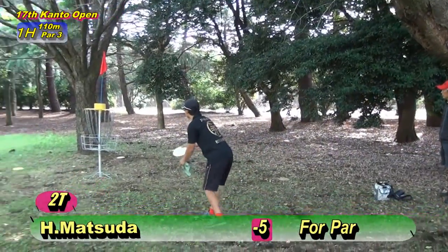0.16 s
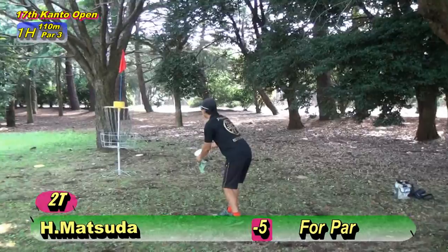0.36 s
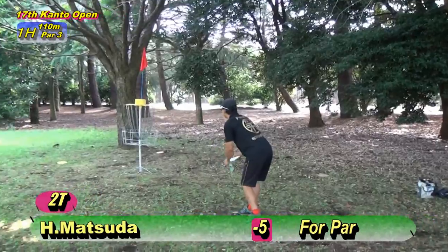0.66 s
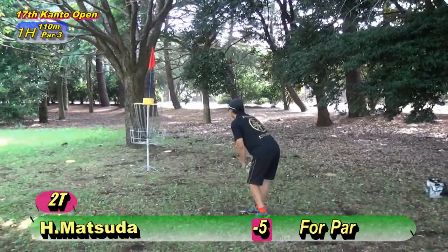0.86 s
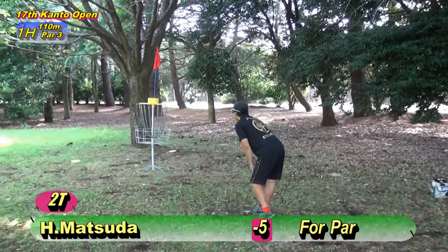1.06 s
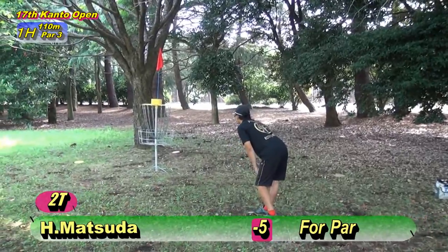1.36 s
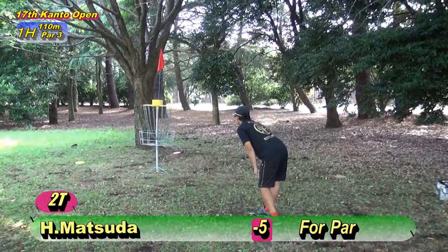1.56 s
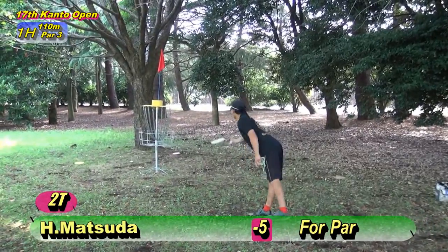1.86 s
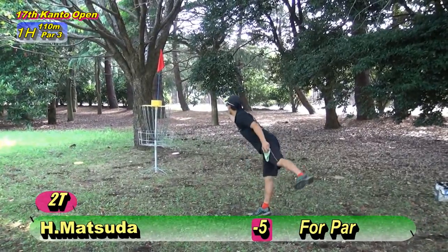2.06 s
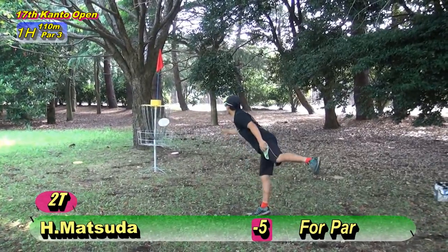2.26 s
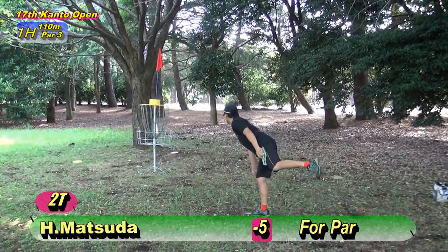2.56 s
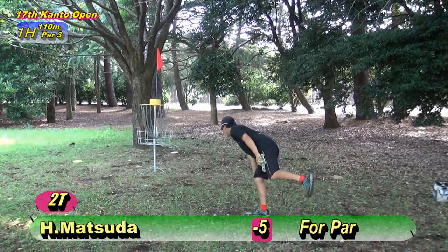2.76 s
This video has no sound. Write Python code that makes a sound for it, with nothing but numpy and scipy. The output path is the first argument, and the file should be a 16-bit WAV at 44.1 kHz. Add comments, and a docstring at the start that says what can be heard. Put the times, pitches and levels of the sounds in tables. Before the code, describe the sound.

A thrown plastic disc hits the steel chains of a target basket with a knock and bright jangling rattle, then drops into the tray; before it, only cicadas and a faint shoe scuff in an open wooded park.

```python
"""Disc putt in a wooded park

A shoe scuffs litter (noise bursts); a plastic disc knocks on a steel basket (noise, cage modes) and drops in.
Chain links rattle in surges of random ticks through link modes; clinks, clashes and ring chimes stand out.
Cicadas, a pulsed noise band and fuzzy overtones, sink in pitch over low rumble and a faint hiss of leaves."""
import sys
import numpy as np
from scipy import signal
from scipy.fft import rfft, irfft, next_fast_len
from scipy.io import wavfile
from scipy.ndimage import uniform_filter1d, map_coordinates

SR = 44100
rng = np.random.default_rng(int(sys.argv[2]) if len(sys.argv) > 2 else 0)


def transcribe(u):
    """Save the signal u as a 16-bit wav file named by the first command-line argument.

    u: samples, shape (n,) or (channels, n), limited to [-1, 1]; the rate is SR.
    q: integer samples, one column per channel.
    """
    v = np.clip(np.atleast_2d(u).T, -1, 1)
    q = np.round(v * 32767).astype(np.int16)
    wavfile.write(sys.argv[1], SR, q)


N = 127890
TOP_HZ = 15300  # upper band limit
CONTACT_RISE_S = 0.0015  # onset of a steel ringing

# modes of one chain link: mode_hz, level_db, t60_s
LINK_MODES = [(11530, -1.5, 0.13), (11440, -10.5, 0.051), (12540, -10.5, 0.11), (13760, -13.5, 0.07)]


def amp(db):
    """Decibels to gain."""
    return 10 ** (np.asarray(db) / 20)


def unit(x):
    """Scale to rms 1."""
    return x / np.sqrt(np.mean(x ** 2) + 1e-20)


def along(points, hz):
    """Interpolate (Hz, value) points on a log frequency axis."""
    point_hz, value = np.transpose(points)
    return np.interp(np.log(hz + 1), np.log(point_hz + 1), value)


def filtered(x, response):
    """Multiply the spectrum of x by a response of frequency."""
    size = next_fast_len(N + 8192)
    return irfft(rfft(x, size) * response(np.fft.rfftfreq(size, 1 / SR)), size)[..., :N]


def noise(spectrum, tilt_db_per_octave=0):
    """Coloured noise of rms 1, tilted about 1 kHz (tilt constant below 400 Hz)."""
    def response(hz):
        tilt_db = tilt_db_per_octave * np.log2(np.maximum(hz, 400) / 1000)
        return amp(along(spectrum, hz) + tilt_db) * hz / (hz + 60)
    return unit(filtered(rng.standard_normal(N), response))


def swell(start_s, level_db, rise_s, t60_s):
    """An envelope that rises straight and dies exponentially."""
    t = np.arange(N) / SR - start_s
    return np.clip(t / rise_s, 0, 1) * amp(level_db - 60 * np.maximum(t - rise_s, 0) / t60_s)


def ringing(modes, detune, scatter_db=2):
    """Half a second of decaying sine modes, with random detuning, level and phase."""
    t = np.arange(SR // 2) / SR
    total = 0
    for hz, level_db, t60_s in modes:
        decay = amp(level_db + scatter_db * rng.normal() - 60 * t / t60_s)
        total = total + decay * np.sin(2 * np.pi * (hz * (1 + detune * rng.normal()) * t + rng.random()))
    return total


def strike(start_s, modes):
    """One ringing of a steel part, with a short straight onset."""
    rise = np.minimum(np.arange(SR // 2) / SR / CONTACT_RISE_S, 1)
    ring = ringing(modes, 0, scatter_db=0.5) * rise
    return np.pad(ring, (round(start_s * SR), N))[:N]


def placed(x, left_db):
    """Set a mono source between the ears; left_db is left minus right."""
    return x * amp(np.array([[left_db], [-left_db]]) / 2)


def air():
    """Distant rumble and faint leaf hiss: coloured noise, the rumble decorrelated between ears."""
    # rumble colour: hz, level_db
    rumble_colour = [(15, -50), (28, -15.5), (56, -9.5), (72, -0.5), (142, -3), (225, -5), (350, -17.5),
                     (520, -16), (880, -21), (5500, -47), (9000, -90)]
    # likeness of the two ears: hz, correlation
    ear_likeness = [(30, 0.67), (100, 0.96), (1000, 0.94), (4000, 1)]
    # balance: hz, left_minus_right_db
    balance = [(80, -1), (160, 7.5), (1000, 5), (4000, -2)]
    # leaf hiss colour: hz, level_db
    hiss_colour = [(3000, -7), (12900, -5.5), (13800, -55)]
    rumble_db, hiss_db = -45.5, -62.5

    def mid_side(hz):
        angle = np.arccos(np.clip(along(ear_likeness, hz), -1, 1)) / 2
        return amp(along(rumble_colour, hz)) * [np.cos(angle), np.sin(angle)]

    mid, side = filtered(rng.standard_normal((2, N)), mid_side)
    ears = np.array([mid + side, mid - side])
    rumble = filtered(ears, lambda hz: amp(np.outer([1, -1], along(balance, hz)) / 2))
    return amp(rumble_db) * unit(rumble) + amp(hiss_db) * noise(hiss_colour)


def cicadas():
    """A noise band pulsed by the tymbals slides in pitch through a fixed random spectral ripple."""
    # song: start_s, centre_hz, level_db
    song_path = [(0, 8560, -45.5), (.45, 8510, -46.5), (1, 8014, -46), (1.5, 7780, -47), (2, 7360, -46.5),
                 (2.9, 7040, -47)]
    # band colour before the slide: hz, level_db
    band = [(5000, -63), (6400, -24.5), (7100, -13), (7700, -4.5), (8150, -2), (8800, -6.5), (9700, -17),
            (11000, -29), (12500, -39)]
    band_centre_hz, ear_correlation = 8000, 0.42
    tymbal_hz, rate_jitter, pulse_depth = 495, 0.092, 0.22
    ripple_db, ripple_step_hz = 2, 44.9
    t = np.arange(N) / SR
    s, centre_hz, level_db = np.transpose(song_path)

    mid, side = filtered(rng.standard_normal((2, N)), lambda hz: amp(along(band, hz)))
    side = side * np.sqrt((1 - ear_correlation) / (1 + ear_correlation))
    shift_hz = np.interp(t, s, centre_hz) - band_centre_hz
    slide = np.exp(2j * np.pi * np.cumsum(shift_hz) / SR)
    rate_hz = tymbal_hz * (1 + rate_jitter * unit(uniform_filter1d(rng.standard_normal(N), size=400)))
    pulsing = 1 + pulse_depth * np.sin(2 * np.pi * np.cumsum(rate_hz) / SR)
    song = (signal.hilbert(np.array([mid + side, mid - side])) * slide).real * pulsing

    ripple = rng.uniform(-0.73, 1, size=1200)
    steps = np.arange(len(ripple))
    song = filtered(song, lambda hz: amp(ripple_db * np.interp(hz / ripple_step_hz, steps, ripple)))
    return unit(song) * amp(np.interp(t, s, level_db))


def cicada_lines():
    """As the song winds down, regular tymbal pulsing gives fuzzy lines at multiples of its rate."""
    # regular pulsing: start_s, rate_hz, level_db
    pulse_path = [(1.4, 613, -52), (2, 593.2, -50), (2.9, 573.6, -47)]
    # lines: multiple_of_rate, level_db
    overtones = [(10, -19), (11, -7), (12, 3.5), (13, 1)]
    rate_jitter = 0.00739
    s, path_hz, level_db = np.transpose(pulse_path)
    t = np.arange(N) / SR
    jitter = rate_jitter * unit(uniform_filter1d(rng.standard_normal(N), size=120))
    phase = 2 * np.pi * np.cumsum(np.interp(t, s, path_hz) * (1 + jitter)) / SR
    # each ear gets its own phase offsets
    tone = sum(amp(db) * np.sin(round(k) * phase + rng.normal(0, 0.99, (2, 1))) for k, db in overtones)
    return unit(tone) * amp(np.interp(t, s, level_db))


def shoe():
    """The thrower shifts weight on dry leaves: swells of litter-coloured noise."""
    # scuffs: start_s, level_db, rise_s, t60_s
    scuffs = [(1.71, -51, 0.016, 0.13), (1.868, -44, 0.0033, 0.15), (1.977, -51, 0.0022, 0.03)]
    # leaf litter colour: hz, level_db
    litter = [(250, -4), (750, 7.5), (2100, -6.5), (4000, -11.5), (9000, -38)]
    return noise(litter) * sum(swell(*row) for row in scuffs)


def disc():
    """Dead plastic knocks on chains, pole and tray: noise bursts, each with a short modal cage clank."""
    # knocks: start_s, level_db, t60_s, tilt_db_per_octave
    knocks = [(2.2328, -23.5, 0.041, 2.5), (2.2375, -26, 0.017, -1), (2.251, -35, 0.039, -6),
              (2.2988, -31.5, 0.057, -7), (2.627, -42, 0.2, -1.5)]
    # plastic colour: hz, level_db
    plastic_colour = [(300, -22), (650, 0), (900, 6.5), (2200, 5.5), (4200, 3), (8000, -6)]
    # cage modes: mode_hz, level_db, t60_s
    cage_modes = [(842, -5, 0.035), (1120, -7, 0.033), (1910, -1.5, 0.049), (3420, -8, 0.044)]
    cage_db, rise_s = -7, 0.00072
    lowest_hz = cage_modes[0][0]
    thuds, clanks = 0, 0
    for s, db, t60_s, tilt in knocks:
        thuds = thuds + noise(plastic_colour, tilt) * swell(s, db, rise_s, t60_s)
        modes = [(hz, db + level + tilt * np.log2(hz / lowest_hz), life_s) for hz, level, life_s in cage_modes]
        clanks = clanks + strike(s, modes)
    return thuds + amp(cage_db) * clanks


def clinks():
    """Hard link-on-link contacts: a bright noise crack, and link modes scaled to each pitch and decay."""
    # clinks: start_s, level_db, pitch_hz, t60_s
    contacts = [(2.2345, -17, 12080, 0.078), (2.2483, -16, 11950, 0.076), (2.263, -20, 11550, 0.22),
                (2.308, -23.5, 11570, 0.11), (2.344, -19.5, 11460, 0.2), (2.381, -18, 11580, .14),
                (2.405, -24.5, 11370, 0.32), (2.503, -19, 11570, .13), (2.539, -21.5, 11480, 0.076),
                (2.569, -27, 11730, 0.16), (2.618, -22, 11600, 0.094), (2.723, -20.5, 11650, 0.07),
                (2.776, -29, 11680, 0.14), (2.888, -29, 11480, 0.093)]
    # crack colour: hz, level_db
    crack_colour = [(3000, -19.5), (10000, -11.5), (11700, 4), (14500, -26)]
    crack_db, crack_t60_s = -9, 0.029
    main_hz, _, main_t60_s = LINK_MODES[0]
    cracks, rung = 0, 0
    for s, db, pitch_hz, t60_s in contacts:
        cracks = cracks + swell(s, db + crack_db, CONTACT_RISE_S, crack_t60_s)
        modes = [(hz * pitch_hz / main_hz, db + level, life_s * t60_s / main_t60_s)
                 for hz, level, life_s in LINK_MODES]
        rung = rung + strike(s, modes)
    return noise(crack_colour) * cracks + rung


def chains(strands=8, wires_per_strand=14):
    """Swinging strands tick at random in surges, exciting link modes and many weak overtones."""
    # surges: start_s, level_db, rise_s, t60_s
    surges = [(2.240, -29, 0.012, 0.5), (2.311, -33, 0.008, 0.59), (2.502, -41.5, 0.006, 0.69),
              (2.627, -42.5, 0.006, 0.61), (2.83, -53, 0.0076, 0.36)]
    # rattle colour: hz, level_db
    rattle_colour = [(400, -17), (800, -5.5), (3000, -2), (8000, -2), (10200, 3.5), (12200, -17),
                     (14000, 3.5), (15000, -34)]
    contacts_per_s, contact_scatter_db = 2200, 3.5  # rate for all strands together
    tick_db, wire_db, link_db = 2, 0.8, 4
    wire_t60_s, link_detune = 0.065, 0.00353
    shape = (strands, N)

    motion = sum(swell(*row) for row in surges)
    ticks = (rng.random(shape) < contacts_per_s / strands / SR) * rng.choice([-1, 1], shape)
    ticks = ticks * amp(contact_scatter_db * np.clip(rng.standard_normal(shape), -2, 2))
    ticks = unit(ticks) * motion / np.sqrt(strands)

    def through(x, ring):
        return signal.fftconvolve(x, ring / np.linalg.norm(ring))[:N]

    links = sum(through(x, ringing(LINK_MODES, link_detune)) for x in ticks)
    # overtones of chains and cage wires, one random pitch per equal slot up to TOP_HZ
    count = strands * wires_per_strand
    wire_hz = (np.arange(count) + rng.random(count)) * TOP_HZ / count
    wires = 0
    for k, x in enumerate(ticks):
        wires = wires + through(x, ringing([(hz, 0, wire_t60_s) for hz in wire_hz[k::strands]], 0))
    rattle = amp(tick_db) * ticks.sum(0) + amp(wire_db) * wires
    rattle = filtered(rattle, lambda hz: amp(along(rattle_colour, hz)) * hz / (hz + 100))
    return rattle + amp(link_db) * links


def clashes():
    """Whole strands hit each other and the pole: short, grainy volleys of filtered random ticks."""
    # clashes: start_s, level_db
    volleys = [(2.251, -28.5), (2.322, -31), (2.375, -28.5), (2.486, -35.5), (2.51, -32.5), (2.627, -36.5),
               (2.639, -35.5), (2.704, -41)]
    # clash colour: hz, level_db
    clash_colour = [(600, -17.5), (2000, -2), (6000, -1), (15000, -6.5)]
    rise_s, t60_s, ticks_per_s = 0.00064, 0.053, 2000
    ticks = (rng.random(N) < ticks_per_s / SR) * rng.choice([-1, 1], N)
    grain = unit(filtered(ticks, lambda hz: amp(along(clash_colour, hz))))
    return grain * sum(swell(s, db, rise_s, t60_s) for s, db in volleys)


def rings():
    """Gathering rings: each blow chokes the ring it meets and starts a new two-mode, wavering chime."""
    # blows: start_s, ring_name, level_db, upper_minus_lower_db, lower_t60_s
    blows = [(2.316, "middle", -27, -12, .4), (2.323, "middle", -28, 7.5, 0.32),
             (2.323, "small", -31, 10, 0.3), (2.328, "large", -30.5, 3.5, 0.58),
             (2.427, "large", -36, -2.5, 0.6), (2.478, "large", -45, 4, 0.66),
             (2.505, "small", -33, 2, .13), (2.513, "middle", -49, 13.5, 0.3),
             (2.563, "large", -44, -11, 1.7), (2.623, "large", -41.5, -12, 0.57)]
    # bending modes by ring name: lower_hz, upper_hz
    ring_modes = {"large": (2533, 7098), "middle": (2582, 7153), "small": (2636, 7210)}
    upper_life_ratio, choke_s = 0.83, 0.0027  # choke_s: time constant
    flutter_db, flutter_points_per_s = 1.5, 50
    t = np.arange(N) / SR
    chime = dict.fromkeys(ring_modes, 0)
    for s, name, db, upper_db, t60_s in blows:
        low_hz, high_hz = ring_modes[name]
        choke = np.exp(-np.maximum(t - s, 0) / choke_s)
        new = strike(s, [(low_hz, db, t60_s), (high_hz, db + upper_db, upper_life_ratio * t60_s)])
        chime[name] = chime[name] * choke + new

    def flutter():
        return map_coordinates(rng.standard_normal(1000), [t * flutter_points_per_s], mode="wrap")

    return sum(x * amp(flutter_db * flutter()) for x in chime.values())


def tray():
    """The disc drops into the tray, whose modes ring."""
    # tray modes: mode_hz, level_db, t60_s
    tray_modes = [(1556, -50.5, 0.34), (2080, -39.5, 0.17)]
    return strike(2.633, tray_modes)


def trees(x):
    """A thin scatter from the trunks: coloured x through decaying noise, separate for each ear."""
    # scatter colour: hz, level_db
    wood_colour = [(500, 13), (1500, -19), (12000, 5.5)]
    t60_s, rise_s, scatter_db = 0.15, 0.0049, -21
    coloured = filtered(x, lambda hz: amp(along(wood_colour, hz)))
    t = np.arange(SR // 2) / SR
    tail = rng.standard_normal((2, len(t))) * amp(-60 * t / t60_s) * np.minimum(t / rise_s, 1)
    tail = tail / np.linalg.norm(tail[0])
    return amp(scatter_db) * signal.fftconvolve(coloured[None], tail, axes=1)[:, :N]


def scene():
    """Sum the basket near the centre, disc and shoe to the left, and the wood all round."""
    insects = placed(cicadas() + cicada_lines(), left_db=1.5)
    plastic = disc()
    steel = clinks() + chains() + clashes() + rings() + tray()
    basket = placed(steel, left_db=-0.1) + placed(plastic, left_db=2)
    return air() + insects + placed(shoe(), left_db=3.2) + basket + trees(steel + plastic)


def record(dry):
    """Fade the spectrum to nothing over the 400 Hz below the band limit."""
    return filtered(dry, lambda hz: np.clip((TOP_HZ - hz) / 400, 0, 1))


dry = scene()
out = record(dry)
transcribe(out)
```